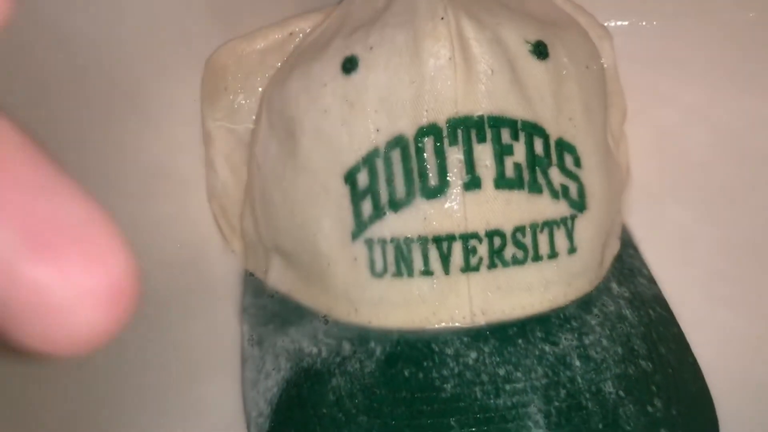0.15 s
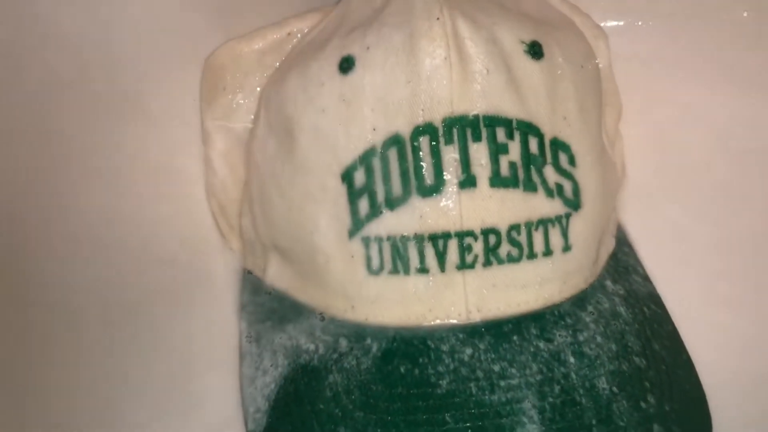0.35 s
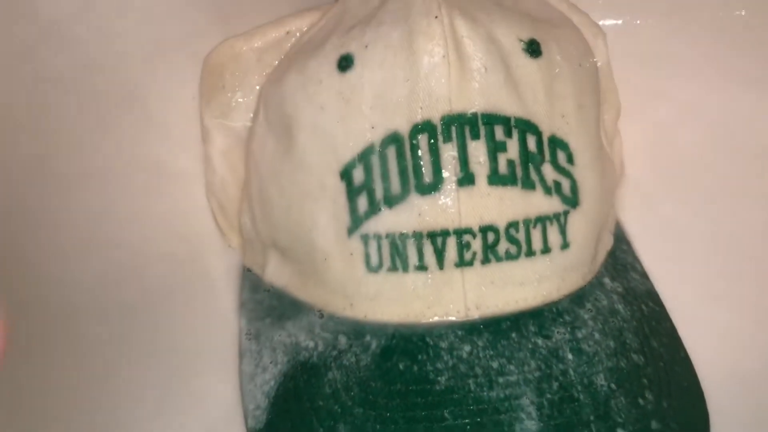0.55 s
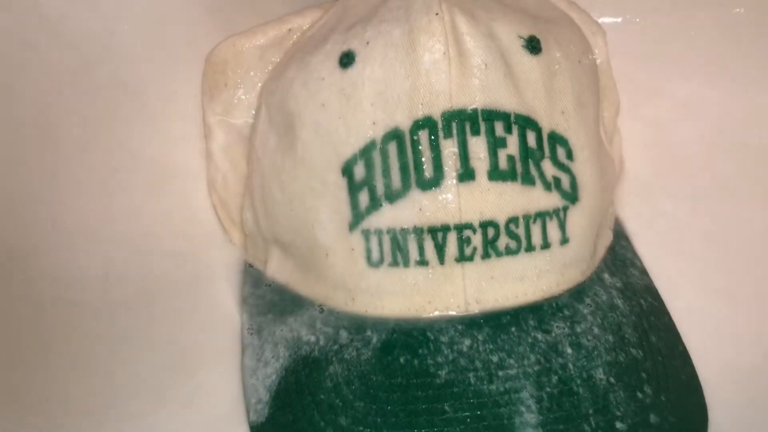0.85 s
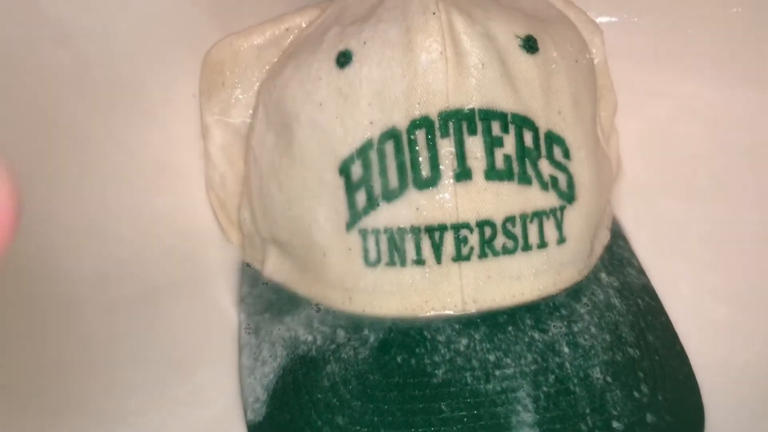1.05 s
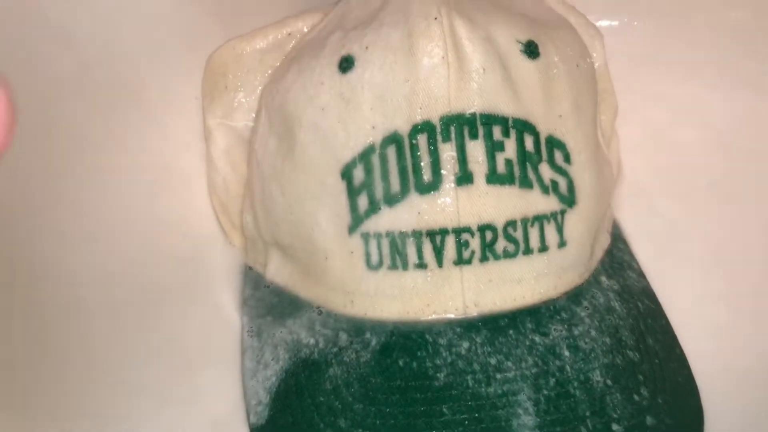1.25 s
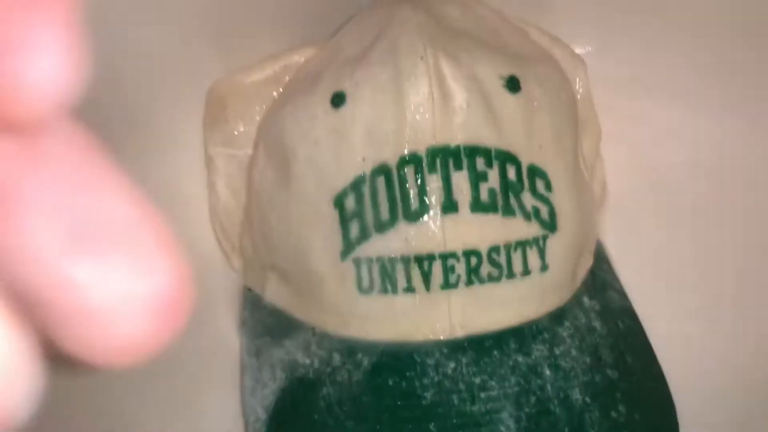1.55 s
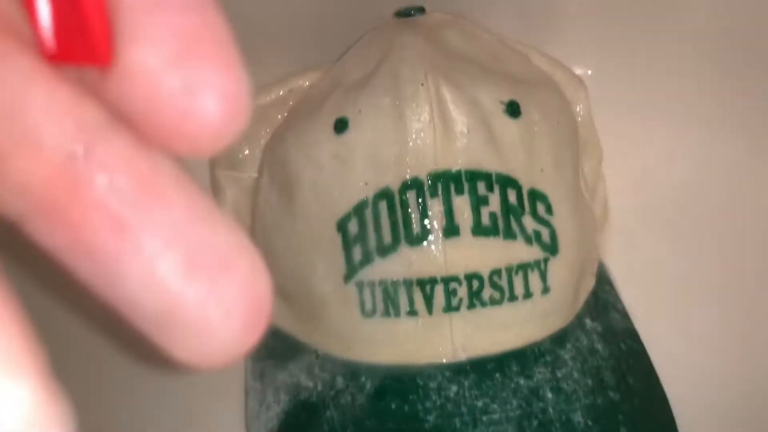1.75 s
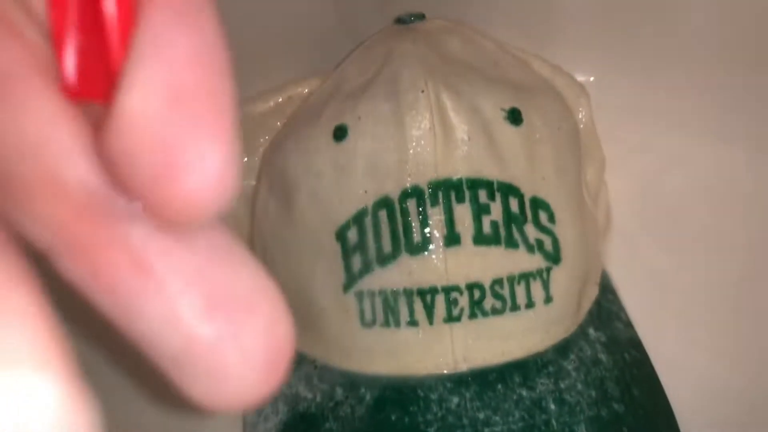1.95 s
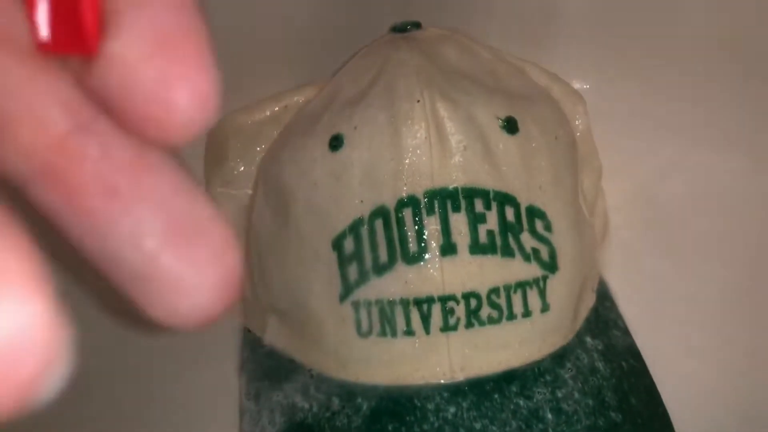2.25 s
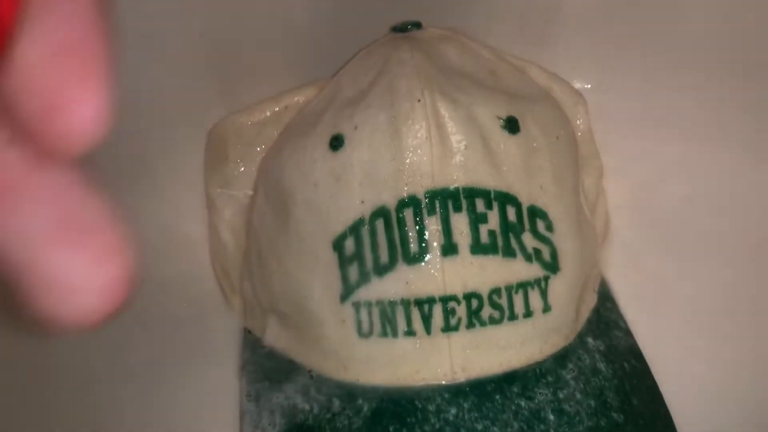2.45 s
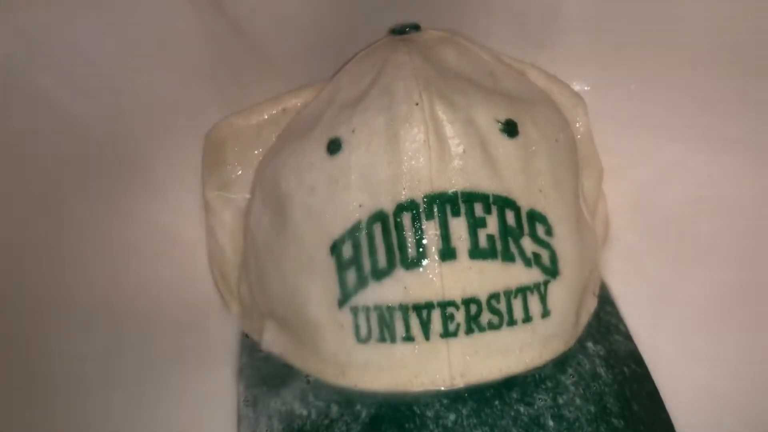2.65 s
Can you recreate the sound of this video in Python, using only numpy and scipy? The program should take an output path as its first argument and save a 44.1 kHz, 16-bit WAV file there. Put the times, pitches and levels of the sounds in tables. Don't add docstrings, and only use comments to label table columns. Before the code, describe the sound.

A trigger spray bottle squirts a wet cloth cap, heard very close in a small hard room. Plastic ticks at 0.1 s, then a hard knock at 0.23 s bounces and booms in the basin until 0.6 s. Bright hissing squirts come at 0.7, 1.3, 1.9 and 2.5 s, each splashing, drumming, sputtering and ending in a trigger clack. Softer bumps follow around 0.8-1.1 s; faint hum beneath.

```python
import sys
import numpy as np
from scipy import signal
from scipy.fft import rfft, irfft
from scipy.io import wavfile
from scipy.ndimage import uniform_filter1d

SR = 44100
rng = np.random.default_rng(int(sys.argv[2]) if len(sys.argv) > 2 else 0)


def master(y):
    cut = np.clip(np.atleast_2d(y).T, -1, 1)
    pcm = np.round(cut * 32767)
    wavfile.write(sys.argv[1], SR, pcm.astype(np.int16))


def voltage_ratio(decibels):
    exponent = np.asarray(decibels, float) / 20
    return 10 ** exponent


N = 123479

# time in seconds, level in dB.
PRESSURE = [
    [(.706, -73), (.7172, -58), (.7182, -32), (.734, -38.5), (.75, -31.5), (.806, -37.5), (.83, -47),
     (.87, -60), (.94, -80)],
    [(1.284, -67), (1.3045, -43), (1.3055, -36.5), (1.316, -36), (1.3175, -38), (1.335, -30), (1.41, -49),
     (1.452, -48), (1.47, -80)],
    [(1.882, -63), (1.889, -50.5), (1.895, -36), (1.922, -30.5), (1.97, -37), (2.012, -63), (2.026, -79),
     (2.045, -53), (2.11, -76)],
    [(2.456, -58), (2.4755, -53), (2.4765, -39.5), (2.504, -32), (2.546, -34), (2.584, -47), (2.62, -40),
     (2.63, -54), (2.7, -82)],
]
# time in seconds, level in dB.
LANDING = [
    [(.735, -66), (.745, -46), (.8, -37.5), (.85, -51.5), (.94, -67)],
    [(1.32, -67), (1.331, -40.5), (1.42, -40.5), (1.432, -51.5), (1.5, -71)],
    [(1.912, -93.5), (1.924, -47.5), (1.98, -42), (2.018, -47), (2.03, -61), (2.11, -67.5)],
    [(2.492, -86), (2.502, -39.5), (2.545, -41.5), (2.6, -41), (2.675, -74.5), (2.685, -67.5)],
]
DRUM_DB = [-4.5, -3, -3, 0.5]
# frequency in Hz, level in dB.
NOZZLE = [(900, -51.5), (1500, -20), (4000, -22.5), (9800, -14.5), (11500, -12), (14900, -2), (15800, -2),
          (16500, -26)]
# frequency in Hz, level in dB.
SPLASH = [(150, -32), (260, -8), (441, -2), (2230, -12.5), (2530, -4.5), (5380, -13), (12000, -15.5),
          (15600, -49), (22000, -120)]
# frequency in Hz, width in Hz, level in dB.
CAP = [(291.2, 75, -6.5), (443.5, 93, 1.5), (648, 39, -6), (1144, 310, -3), (1722, 140, -5.5),
       (2602, 140, -4), (3050, 267, -16.5)]
# start in seconds, level in dB, pitch in Hz, T60 in seconds.
SLUGS = [(1.925, -29.5, 458, 0.046), (1.98, -40, 440, 0.033), (1.998, -33, 460, 0.046),
         (2.017, -39, 464, 0.048), (2.067, -36, 458, 0.032), (2.499, -36.5, 620, 0.046),
         (2.503, -27, 304, 0.056), (2.514, -34.5, 433, 0.16), (2.538, -28, 530, 0.045),
         (2.565, -49, 680, 0.038), (2.595, -24.5, 503, 0.041), (2.619, -32.5, 390, 0.042),
         (2.636, -40, 457.5, 0.14), (2.655, -38.5, 430, 0.11)]
# start in seconds, level in dB.
SPITS = [(0.399, -30), (0.465, -27), (.7435, -17), (0.885, -29), (.894, -30), (1.413, -25.5), (1.4432, -22),
         (1.4297, -15.5), (1.4358, -18), (1.4485, -17), (1.894, -15.5), (2.033, -15.5), (2.0375, -13.5),
         (2.042, -17), (2.0587, -23), (2.095, -45), (2.4769, -24.5), (2.483, -27), (2.4857, -35),
         (2.4994, -11), (2.54, -11.5), (2.593, -11), (2.5965, -9), (2.609, -17), (2.624, -18),
         (2.6387, -23), (2.655, -30), (2.659, -31), (2.673, -41), (2.685, -44), (2.7621, -36.5)]
# start in seconds, level in
# dB, pitch in Hz, low thud in dB above the tick.
TICKS = [(0.112, -27.5, 3280, -13), (0.1893, -44, 3020, -9.5), (.209, -40.5, 4560, -16),
         (0.2601, -27.5, 1980, -17), (0.3747, -52, 6170, -24), (0.6191, -43.5, 3200, -4),
         (0.647, -55, 2800, -10), (0.6814, -47, 6100, -38), (1.2318, -55.5, 2940, -17),
         (.7075, -41.5, 1210, -22), (0.7118, -38, 3050, -16), (0.719, -43, 3000, -30),
         (0.744, -28, 1210, -16), (0.9359, -39, 2820, -6.5), (1.1933, -35.5, 3250, -8),
         (1.5121, -25, 1190, -27), (1.6165, -34, 2590, -6.5), (1.644, -52, 1290, -26),
         (1.757, -52, 2840, -1), (1.7677, -37, 3185, -6), (2.0673, -47.5, 1530, 3), (2.181, -55, 1310, 5.5),
         (2.2145, -46, 1180, -1), (2.3076, -41.5, 2910, -24.5), (2.3166, -47, 3000, -2),
         (2.3495, -43.5, 1225, -12.5), (2.6496, -29, 1100, -13.5), (2.6476, -32.5, 3100, -34),
         (2.7954, -33, 1180, -7)]
# frequency in Hz, width in Hz, level in dB.
THUD = [(215, 73, -4), (343.7, 160, -1), (575, 270, -7)]
# start in seconds, level in dB, gap between taps in seconds,
# second tap in dB, third tap in dB.
RETURNS = [
    (.949, -32.5, 0.0045, 6.5, -3.5),
    (1.5316, -30, 0.0053, 4, -11),
    (2.117, -27, 0.0055, -1.5, -19),
    (2.711, -33, 0.0048, 7, -1),
]
# frequency in Hz, level in dB.
RETURN = [(500, -10), (1200, -7.5), (3000, 1), (5200, 0.5), (7500, -9), (16000, -15.5)]
# start in seconds, length in seconds.
SCUFF_TIMES = [(.19, .04), (.405, .055), (.415, .03), (.465, .017)]
# level in dB, centre in Hz, width in Hz.
SCUFF_TONES = [
    (-46.5, 790, 1000),
    (-62.5, 6900, 2900),
    (-48.5, 940, 560),
    (-48.5, 7000, 3100),
]
# start in seconds, length in seconds, level in dB,
# top pitch in Hz, arch depth in Hz.
REFILLS = [(.62, 0.12, -81, 4350, 40), (.62, 0.07, -80, 11750, 600), (1.095, 0.13, -78, 6600, 50),
           (1.255, 0.056, -79.5, 4200, 150), (1.09, .11, -87, 14000, 700)]
# frequency in Hz, level in dB, T60 in seconds.
KNOCK = [(470, -9, 0.12), (702, -9.5, 0.037), (842, -2, 0.04), (1030, -7, 0.025), (1250, -5, 0.018),
         (1620, -5.5, 0.01), (2100, -13, .01), (2810, -2, .012), (3450, -1.5, 0.0077), (4240, -5.5, 0.011)]
# start in seconds, click in dB, boom in dB.
BUMPS = [(0.4335, -35.5, -30.5), (0.4425, -31.5, -32), (0.4648, -36.5, -29.5), (0.493, -34, -37),
         (0.503, -42, -37.5), (0.5198, -40.5, -50), (.530, -49, -50.5), (0.552, -51, -60),
         (0.559, -52, -56), (0.5835, -43, -49.5), (0.7978, -32, -36.5), (.808, -45, -33), (.848, -48, -41),
         (0.891, -48, -44), (0.997, -30.5, -36), (1.006, -40, -40), (1.0163, -54, -40),
         (1.0338, -38.5, -42), (1.0444, -45, -44.5), (1.0754, -43, -42), (1.0871, -49, -46),
         (1.103, -52.5, -49.5), (1.113, -52, -52.5)]
# frequency in Hz, level in dB, T60 in seconds.
BOTTLE = [(701, 0, .03), (1080, 0.5, .025), (1800, -3, 0.056), (3130, -7.5, 0.015), (4350, -8.5, 0.017)]
# frequency in Hz, width in Hz, level in dB.
BASIN = [(72, 6.1, -2), (102, 15, 3), (149.8, 7.9, -3), (203, 19, -10.5), (297.2, 5.7, -11),
         (427, 90, -16.5), (850, 440, -24), (1880, 68, -20.5)]
# frequency in Hz, level in dB.
FLOOR = [(15, -50.5), (25, -16.5), (138, 3.5), (483, -5), (1600, -20), (2980, -19.5), (4020, -21),
         (14800, -31.5), (16500, -46.5)]

KNOCK_S = 0.23206
HIT = 6000
LONG_HIT = 12000


def evened(x):
    return x / np.sqrt(np.mean(x ** 2) + 1e-20)


def add(mix, s, sound):
    part = mix[round(s * SR):][:len(sound)]
    part += sound[:len(part)]


def colour(x, points):
    f, db = np.transpose(points)
    hz = np.fft.rfftfreq(len(x), 1 / SR)
    gain = voltage_ratio(np.interp(np.log(hz + 1), np.log(f + 1), db))
    return evened(irfft(rfft(x) * gain, len(x)))


def resonate(x, hz, width):
    turn = np.exp(2j * np.pi * np.cumsum(hz * np.ones(len(x))) / SR)
    r = np.exp(-np.pi * width / SR)
    return 2 * (turn * signal.lfilter([1 - r], [1, -r], x / turn)).real


def band(x, hz, width):
    return evened(resonate(resonate(x, hz, width), hz, width))


def body(x, peaks):
    return evened(sum(voltage_ratio(db) * band(x, hz, width) for hz, width, db in peaks))


def dying(t60, rise_s=0.00017, size=HIT):
    t = np.arange(size) / SR
    return np.minimum(t / rise_s, 1) * voltage_ratio(-60 * t / t60)


def ring(modes, rise_s, sag=0):
    t = np.arange(HIT) / SR
    settle_s = 0.0024
    t = t + sag * settle_s * (1 - np.exp(-t / settle_s))
    out = np.zeros(HIT)
    for k, (hz, db, t60) in enumerate(modes):
        out += (-1) ** k * voltage_ratio(db) * dying(t60, rise_s) * np.sin(2 * np.pi * hz * t)
    return out


def grains(per_s, spread_db, size):
    strength = voltage_ratio(spread_db * np.minimum(rng.exponential(1, size), 4))
    sign, noise = np.sign(rng.standard_normal(size)), rng.standard_normal(size)
    return evened(strength * (rng.random(size) < per_s / SR) * sign) + 1.1 * noise


def nozzle_jet(size):
    t = np.arange(size) / SR
    fizz_per_s, fizz_spread_db = 2900, 0.5
    hiss = colour(grains(fizz_per_s, fizz_spread_db, size), NOZZLE) * np.clip(t / 0.045, 0.25, 1)
    air = grains(fizz_per_s, fizz_spread_db, size)
    low_hz, top_hz, climb_s = 11600, 15240, 0.013
    whistle_hz = top_hz - (top_hz - low_hz) * np.exp(-(t / climb_s) ** 2)
    whistle = voltage_ratio(-3.5) * band(air, whistle_hz, 850)
    orifice = voltage_ratio(-15) * band(air, 11980, 1200)
    wobble = uniform_filter1d(uniform_filter1d(rng.standard_normal(size), 90), 90)
    sputter_db = 2.1 * evened(wobble)
    return evened((hiss + whistle + orifice) * voltage_ratio(sputter_db))


def squirt(pressure, landing, drum_db):
    size = 13000
    t = pressure[0][0] + np.arange(size) / SR
    hiss = voltage_ratio(np.interp(t, *np.transpose(pressure), left=-110, right=-110))
    wet = voltage_ratio(np.interp(t, *np.transpose(landing), left=-110, right=-110))
    splash = colour(grains(890, 3, size), SPLASH)
    drum = body(grains(90, 5.5, size), CAP)
    drum_level = wet.max() * (wet / wet.max()) ** 0.51
    return hiss * nozzle_jet(size) + wet * splash + voltage_ratio(drum_db) * drum_level * drum


def slugs():
    out = np.zeros(N)
    for s, db, hz, t60 in SLUGS:
        add(out, s, ring([(hz, db, t60)], 0.003, sag=0.12))
    return out


def spits():
    out = np.zeros(N)
    for s, db in SPITS:
        puff = band(rng.standard_normal(HIT), 12900, 6400)
        add(out, s, voltage_ratio(db - 13.5) * dying(0.011, 0.0012) * puff)
    return out


def trigger_ticks():
    out = np.zeros(N)
    for s, db, hz, low_db in TICKS:
        a, b = rng.standard_normal((2, HIT))
        q = 0.87
        tick = band(a, hz, hz / q) + voltage_ratio(-27.5) * a + 0.16 * band(b, 3200, 3000)
        add(out, s, ring([(hz, db - 3.5, 0.011)], 0.0003))
        add(out, s, voltage_ratio(db - 5.5) * dying(0.013, 0.0012) * tick)
        add(out, s, voltage_ratio(db + low_db + 3) * dying(0.081, 0.004) * body(b, THUD))
    return out


def trigger_returns():
    out = np.zeros(N)
    shape = dying(0.017, 0.00048) + voltage_ratio(-29) * dying(0.13)
    for s, db, gap, second_db, third_db in RETURNS:
        for k, tap_db in enumerate([0, second_db, third_db]):
            tap = colour(rng.standard_normal(HIT), RETURN)
            add(out, s + k * gap, voltage_ratio(db + tap_db - 3.5) * shape * tap)
    return out


def finger_scuffs():
    out, t = np.zeros(N), np.arange(HIT) / SR
    for (s, length), (db, hz, width) in zip(SCUFF_TIMES, SCUFF_TONES):
        shape = np.clip(np.minimum(t / 0.002, (length - t) / 0.0051), 0, 1)
        add(out, s, voltage_ratio(db) * shape * band(grains(2600, 2, HIT), hz, width))
    return out


def pump_refills():
    out, t = np.zeros(N), np.arange(HIT) / SR
    for s, length, db, top_hz, arch_hz in REFILLS:
        shape = np.clip(np.minimum(t, length - t) / 0.016, 0, 1)
        arch = arch_hz * (1.6 - 2.6 * t / length) ** 2 / 2.56
        shake = 40 * uniform_filter1d(rng.standard_normal(HIT), 100)
        add(out, s, voltage_ratio(db) * shape * np.sin(2 * np.pi * np.cumsum(top_hz - arch + shake) / SR))
    return out


def knock():
    out = np.zeros(N)
    knock_db = 2
    # delay in seconds, level in dB, ring in dB, rise in seconds.
    contacts = [(-0.0025, -6, -12.5, 0.0015), (-0.0008, 0, -8, 0.0012), (0.0022, -14, 5, 0.0012)]
    for delay, db, ring_db, rise_s in contacts:
        a, b = rng.standard_normal((2, HIT))
        crack = evened(resonate(a, 0, 6010)) + 0.3 * b
        add(out, KNOCK_S + delay, voltage_ratio(knock_db + db + ring_db) * ring(KNOCK, rise_s, sag=0.3))
        add(out, KNOCK_S + delay, voltage_ratio(knock_db + db - 2) * dying(0.007, rise_s) * crack)
    tail = evened(resonate(rng.standard_normal(LONG_HIT), 600, 1900))
    add(out, KNOCK_S, voltage_ratio(knock_db - 29) * dying(0.13, 0.004, LONG_HIT) * tail)
    return out


def basin():
    out, push = np.zeros(N), np.zeros(N)
    push_shape = dying(0.026, 0.002, LONG_HIT) + voltage_ratio(-12) * dying(0.32, size=LONG_HIT)
    for s, click_db, boom_db in BUMPS + [(KNOCK_S, -99, -20)]:
        a, b = rng.standard_normal((2, LONG_HIT))
        click = band(a, 1840, 970) + 1.6 * resonate(a, 2400, 3800) * dying(0.0075, size=LONG_HIT)
        add(out, s, voltage_ratio(click_db - 13.5) * dying(0.012, size=LONG_HIT) * click)
        modes = [(hz * (1 + 0.05 * a[k]), db + 2.8 * b[k], t60) for k, (hz, db, t60) in enumerate(BOTTLE)]
        add(out, s, voltage_ratio(click_db - 8) * ring(modes, 0.00064))
        add(push, s, voltage_ratio(boom_db) * b * push_shape)
    push = signal.sosfilt(signal.butter(2, 1440, fs=SR, output="sos"), push)
    for hz, width, db in BASIN:
        out += voltage_ratio(db + 22.5) * resonate(push, hz, width) * 10 / np.sqrt(width)
    return out


def room(x):
    tail = rng.standard_normal(LONG_HIT) * dying(0.35, 0.005, LONG_HIT)
    return voltage_ratio(-20) * signal.fftconvolve(x, tail / np.linalg.norm(tail))[:N]


def floor():
    a, b = rng.standard_normal((2, N))
    return voltage_ratio(-65) * colour(a, FLOOR) + voltage_ratio(-73) * evened(resonate(b, 160, 12))


def scene():
    near = slugs() + spits() + trigger_ticks() + trigger_returns() + finger_scuffs() + pump_refills()
    for pressure, landing, drum_db in zip(PRESSURE, LANDING, DRUM_DB):
        add(near, pressure[0][0], squirt(pressure, landing, drum_db))
    return (near + room(near) + knock() + basin() + floor())[None]


def roll_off(x):
    return signal.sosfilt(signal.butter(12, 16990, fs=SR, output="sos"), x)


def record(dry):
    x = signal.sosfilt(signal.butter(4, 52, "high", fs=SR, output="sos"), dry)
    limit = 1.3
    x = limit * np.tanh(x / limit)
    x = signal.oaconvolve(x, signal.firwin(255, 15900, fs=SR)[None], "same")
    return roll_off(x)


dry = scene()
out = record(dry)
master(out)
```